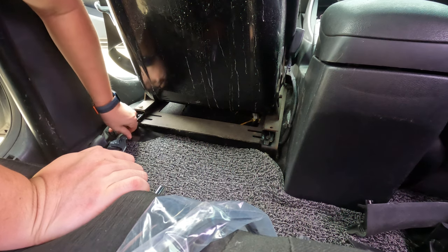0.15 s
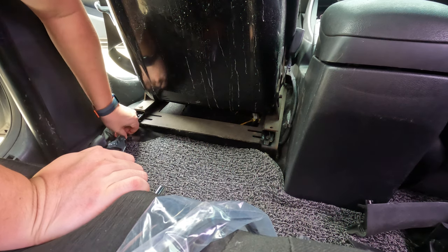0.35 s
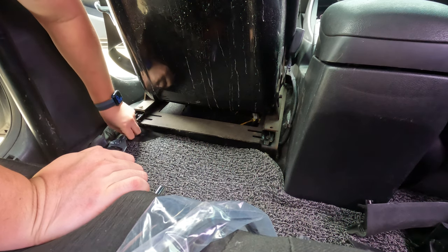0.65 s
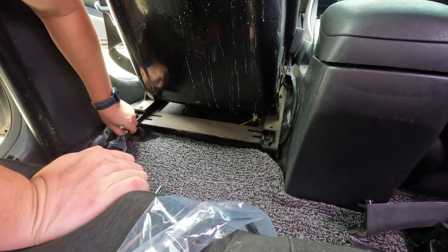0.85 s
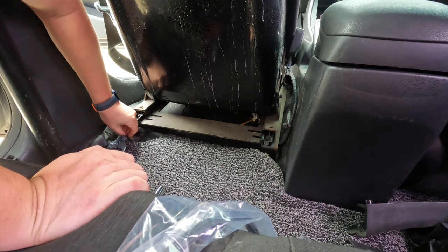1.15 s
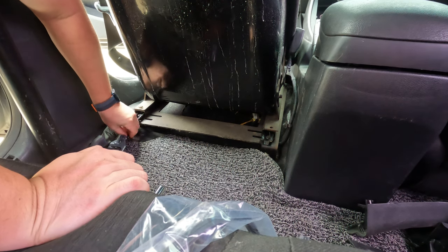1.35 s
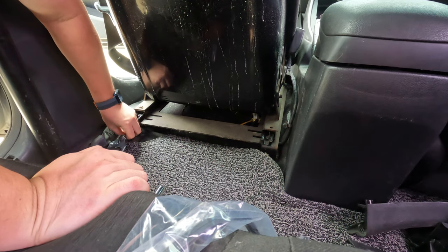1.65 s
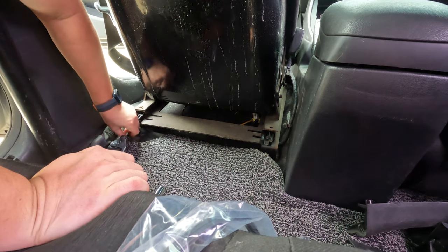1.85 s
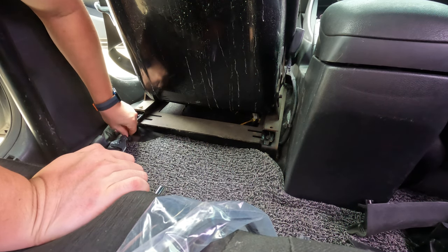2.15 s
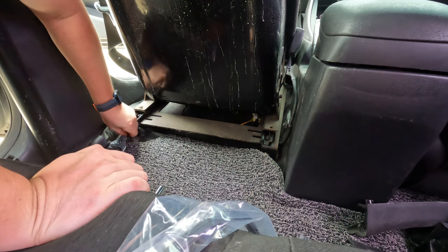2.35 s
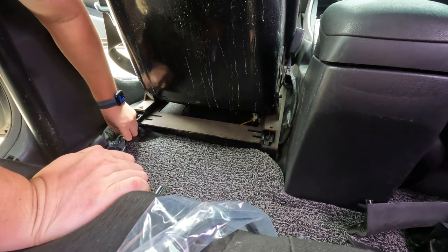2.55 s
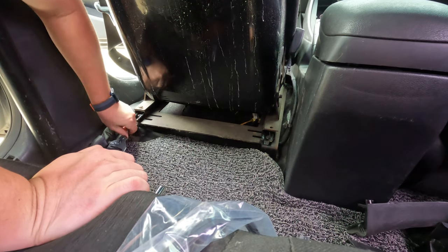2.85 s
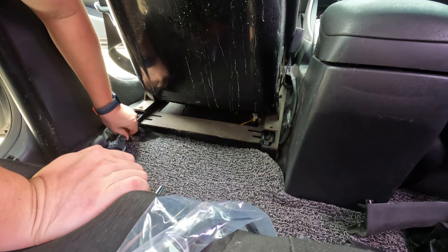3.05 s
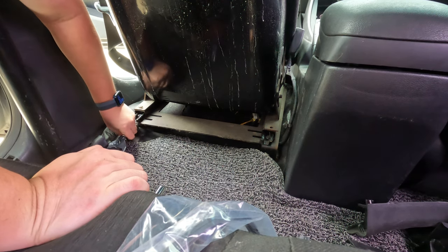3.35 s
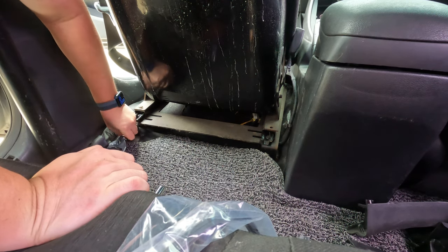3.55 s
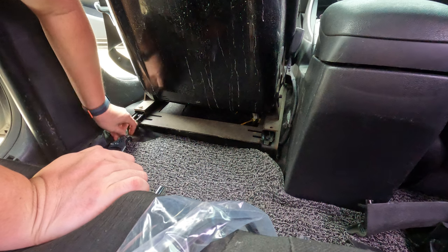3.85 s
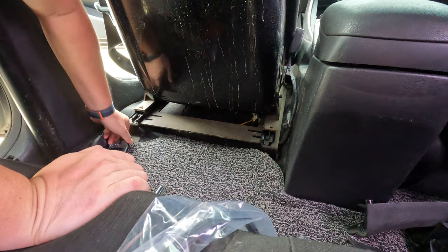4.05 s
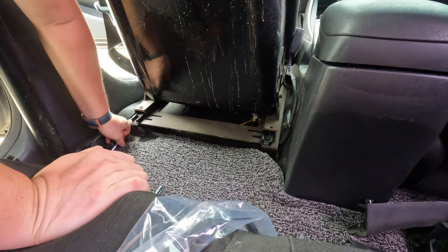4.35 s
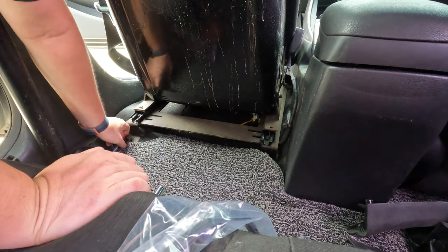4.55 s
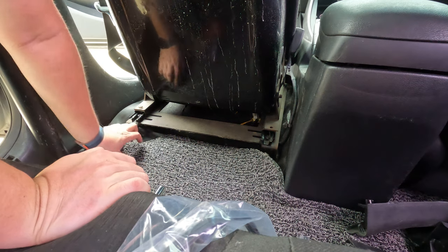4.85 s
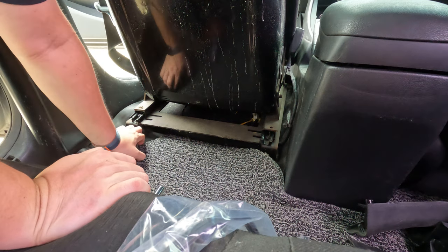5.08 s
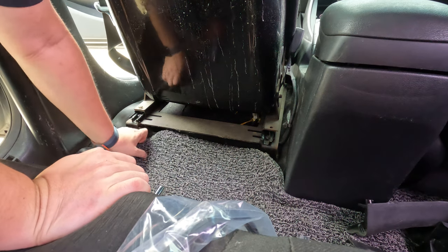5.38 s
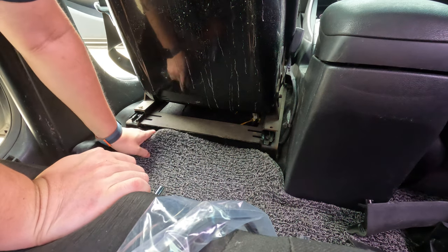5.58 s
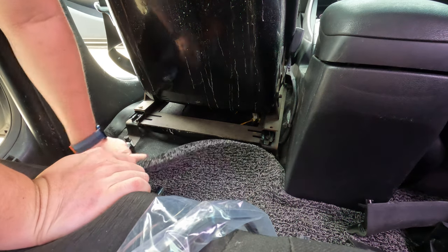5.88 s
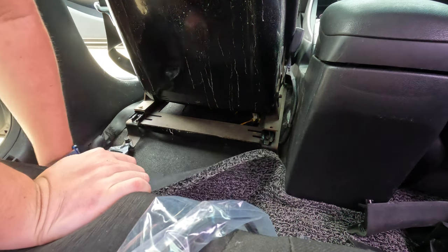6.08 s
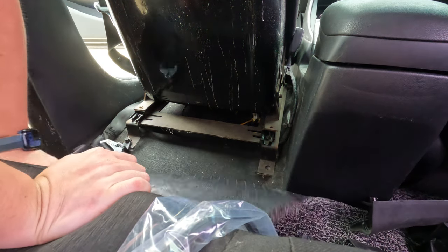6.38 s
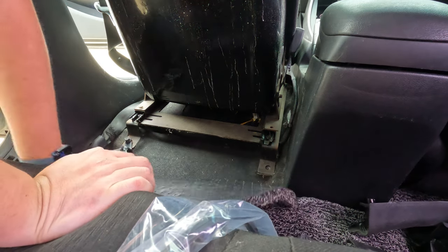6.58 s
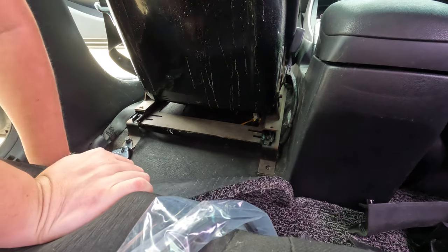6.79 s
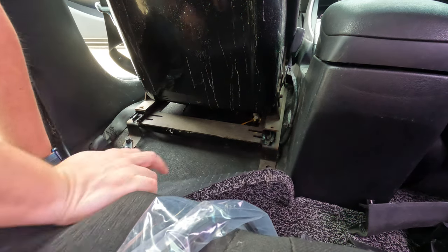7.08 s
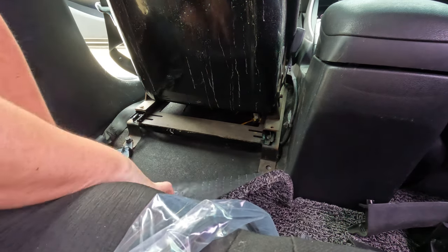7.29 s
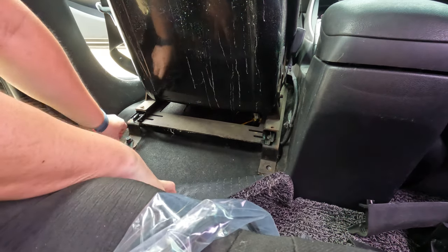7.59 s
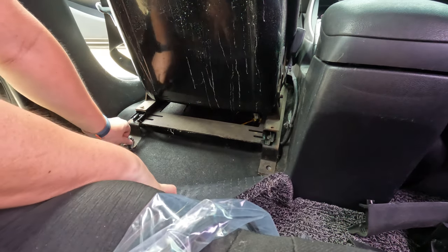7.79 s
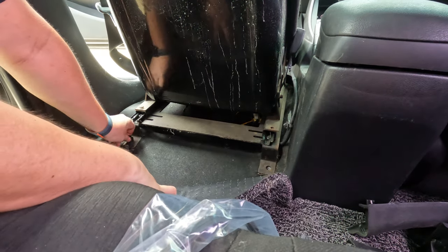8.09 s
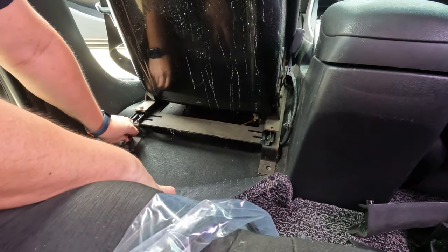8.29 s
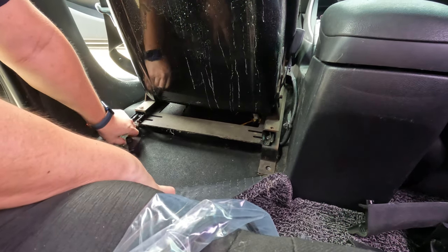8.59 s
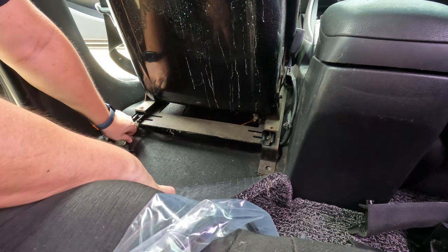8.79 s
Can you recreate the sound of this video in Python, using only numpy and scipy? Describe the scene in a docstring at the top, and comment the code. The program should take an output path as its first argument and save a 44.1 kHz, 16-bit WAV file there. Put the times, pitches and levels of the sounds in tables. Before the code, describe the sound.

Close, short metal clinks and knocks on a car floor, growing busier as a mat is dragged, over a low garage hum.

```python
"""Steel brackets chatter in short dull clinks as a hand fiddles with them on a car floor, close to a microphone.
Each bouncing contact drives the damped modes of the steel. A loose bolt pings, the floor pan thumps,
and heavy blows make the cabin air boom. Parts and a dragged mat scrape in dense small slips,
a sleeve rustles once, and the garage hums in the cabin. The sound is nearly mono."""
import sys
import numpy as np
from scipy import signal
from scipy.fft import rfft, irfft, next_fast_len
from scipy.io import wavfile
from scipy.ndimage import uniform_filter1d

SR = 44100
rng = np.random.default_rng(int(sys.argv[2]) if len(sys.argv) > 2 else 0)


def to_wav(s):
    """Save 16-bit WAV."""
    ch = np.atleast_2d(s).T  # columns
    pcm = np.round(np.clip(ch, -1, 1) * 32767)  # PCM
    wavfile.write(sys.argv[1], SR, pcm.astype(np.int16))


N = 393813
EVENT_SAMPLES = 6144
T = np.arange(EVENT_SAMPLES) / SR

# Bracket modes. Each row: frequency in Hz, level in dB, t60 in seconds.
BRACKET_MODES = [(880, -6, .02), (1130, -4, .016), (1345, -4, .016), (1640, 1, .022), (1790, 1, .021),
                 (1960, -4, .016), (2140, -3, .016), (2360, -2, .017), (2580, -2, .013), (2780, -3, .014),
                 (3120, -2, .013), (3330, -4, .012), (3600, -2, .012), (3800, -4, .012), (4080, -2, .011),
                 (4340, -4, .011), (4690, -6, .022), (4930, -2, .013), (5400, -1, .012), (5700, -2, .012),
                 (6200, -2, .012), (6600, -3, .011), (7700, -6, .011)]
# Steel contacts. Each row: time in seconds, level in dB, main ring in Hz, upper rings in relative dB,
# sizzle in relative dB, chatter t60 in seconds, main ring lift in dB, upper ring in Hz.
CLINK_HITS = [(0.287, -34, 1170, -14, -24, 0.022, 1, 4680),
              (0.389, -24.5, 1480, -3.5, -23, 0.027, -11, 5100),
              (0.448, -35, 1950, -7, -38, 0.035, -1, 4810), (0.469, -30, 1400, -15, -39, 0.022, 4, 4670),
              (0.509, -33.5, 2540, -16, -37, 0.024, 18, 3800),
              (0.519, -30.5, 2500, -10, -36, 0.058, 18, 4670),
              (0.587, -38, 2980, -11, -37, 0.025, 20, 3760), (0.62, -29, 1730, -13, -41, 0.028, 6, 4740),
              (0.647, -29, 1350, -1.5, -37, 0.015, 12, 3730),
              (0.894, -23.5, 1760, -18, -38, 0.017, -4, 3510),
              (0.907, -20.5, 1770, -8, -38, 0.038, -4, 3460),
              (0.932, -25.5, 2480, -9, -37, 0.058, 11, 5740),
              (0.954, -31.5, 1830, -3, -13, 0.051, -8, 4900),
              (0.985, -17, 2000, -8.5, -38, 0.042, 12, 3600), (0.998, -20, 2480, -5, -21, 0.042, 16, 4550),
              (1.059, -24, 1730, -35, -44, 0.063, 8, 3470), (1.09, -11.5, 1680, -39, -53, 0.019, 7, 3600),
              (1.337, -38.5, 1620, -18, -38, 0.027, 11, 4630),
              (1.367, -27.5, 1690, -9, -48, 0.035, 12, 4640), (1.374, -24, 1660, -16, -48, 0.033, 10, 5600),
              (1.399, -41, 1220, -17, -44, 0.022, 10, 3500), (1.417, -27, 1760, -26, -44, 0.015, 17, 3510),
              (1.441, -41, 2400, -7, -30, 0.032, 5, 3800), (1.581, -32.5, 1790, -9, -37, 0.025, 18, 3840),
              (1.597, -33, 1280, -20, -38, 0.018, 6, 3780), (1.979, -37, 1630, -24, -39, 0.019, 18, 3770),
              (2.41, -25.5, 1190, -8, -24, 0.032, 12, 3270), (2.437, -30, 1640, -23, -37, 0.027, 18, 3540),
              (2.464, -30.5, 1620, -9.5, -35, 0.038, 19, 3540),
              (2.626, -32.5, 1820, -2, -40, 0.019, 8, 5270), (2.782, -28, 1470, -1, -37, 0.015, 5, 3930),
              (2.84, -27, 1840, -5.5, -17, 0.024, -4, 7700),
              (2.871, -27.5, 1700, -14, -38, 0.014, 32, 4100),
              (3.069, -31.5, 1570, -10, -36, 0.025, 17, 4700), (3.085, -32, 1690, -5, -38, 0.023, 15, 4730),
              (3.125, -35, 1590, -3, -39, 0.034, 10, 3780), (3.146, -28, 1690, -9, -40, 0.027, -6, 4700),
              (3.156, -29.5, 1810, -21, -45, 0.017, 0, 4660), (3.219, -44, 1700, -8, -40, 0.025, 12, 4690),
              (3.257, -34.5, 1630, -19, -40, 0.046, 16, 4720),
              (3.274, -34, 1630, -18, -40, 0.027, 20, 3550), (3.296, -27.5, 1560, -12, -38, 0.028, 8, 3400),
              (3.817, -18, 1760, -30, -46, 0.011, 21, 3650),
              (3.889, -30, 1740, -13.5, -43, 0.039, -3, 4980), (3.954, -33, 1770, -29, -39, 0.02, 28, 4650),
              (3.974, -32, 1600, -32, -37, 0.031, 25, 4660), (4.017, -35, 1070, -6, -21, 0.029, 8, 3900),
              (4.067, -31, 1630, -3, -24, 0.042, 3, 4070), (4.081, -38, 1750, -5, -40, 0.03, 17, 4730),
              (4.103, -20, 1590, -22, -51, 0.027, 30, 3630), (4.129, -30, 1950, -11, -41, 0.038, 33, 3780),
              (4.158, -30.5, 1940, -9, -40, 0.03, 22, 4400), (4.205, -22, 1790, -6, -35, 0.033, 5, 4230),
              (4.228, -46, 1150, 3, -27, 0.028, 11, 5080), (4.252, -35, 2000, -17, -40, 0.037, -4, 3600),
              (4.267, -15.5, 1590, -14, -49, 0.02, 11, 5000), (4.299, -37, 1700, -12, -40, 0.022, 16, 3600),
              (4.315, -45, 2100, -11, -40, 0.018, 6, 4000), (4.374, -19.5, 1750, -7, -32, 0.022, 2, 4970),
              (4.435, -24.5, 1410, -9, -42, 0.014, -13, 3700), (4.451, -33, 2740, -8, -40, 0.019, 26, 5800),
              (4.558, -38, 2000, -5, -40, 0.027, 15, 3720), (4.667, -27.5, 2300, -7, -21, 0.028, 20, 3520),
              (4.686, -22.5, 1170, -15.5, -41, 0.024, 24, 3620),
              (4.723, -31, 1730, -13, -37, 0.025, 18, 5410),
              (4.743, -27.5, 1710, -13, -35, 0.036, 18, 3980), (4.788, -31, 2350, -5, -38, 0.031, 24, 3940),
              (4.808, -22, 2000, -8, -41, 0.028, 16, 3530), (4.87, -13, 3260, -1, -9.5, 0.022, 23.5, 5950),
              (5.174, -19, 1350, -11.5, -25, 0.0062, 13, 3870), (5.27, -33, 1770, -5.5, -41, 0.1, -9, 3650),
              (5.3, -27, 1765, -9, -48, 0.034, 3, 3860), (5.308, -22, 1765, -3, -48, 0.033, 1, 3760),
              (5.316, -33, 2400, -15, -50, 0.02, 3, 3640), (5.32, -37, 1300, -20, -45, 0.016, 2, 3600),
              (5.353, -16.5, 1750, -2.5, -29, 0.009, 2, 3840), (5.381, -24, 1670, -22, -40, 0.028, 7, 3530),
              (5.429, -23, 1640, -18, -48, 0.027, 0, 4960), (5.531, -20, 2740, -28, -36, 0.011, 10, 3510),
              (5.569, -31, 1770, -11, -12, 0.034, 7, 6200), (5.582, -16.5, 2000, -15, -20, 0.023, 1, 5000),
              (5.589, -3, 1550, -1, -9, 0.0048, 1, 7000), (5.6, -15, 1680, -15, -30, 0.037, 4, 5000),
              (5.639, -22, 1700, -23, -40, 0.035, 16, 3600), (5.662, -27, 1130, -11, -40, 0.01, 17, 4300),
              (5.678, -14.5, 1030, -9.5, -46, 0.0093, 12, 3530),
              (5.732, -27, 1120, -12, -44.5, 0.0083, 18, 3980),
              (5.816, -56, 1150, -19, -33, 0.02, 13, 3890), (5.903, -7, 3010, -24, -48, 0.0048, 33, 3220),
              (5.958, -18, 2520, -23, -37, 0.032, 19, 3430), (5.973, -25, 2700, -3, -37, 0.015, 21, 3600),
              (5.987, -17.5, 1720, -3, -16, 0.038, 8, 5270), (6.01, -4, 1760, -3, -19, 0.029, 5, 3800),
              (6.016, -6, 2000, -3.5, -19, 0.039, 3, 4960), (6.031, -19, 2300, -5, -18, 0.022, 3, 5400),
              (6.039, -0.5, 2630, -13, -18, 0.006, 23, 4100), (6.049, -25, 2000, -8, -25, 0.04, 6, 5000),
              (6.066, -20, 2700, -9, -30, 0.017, 8, 3600), (6.078, -10.5, 2690, -8, -41, 0.016, 24, 4760),
              (6.112, -15.5, 2080, -9, -19, 0.022, 14, 3760),
              (6.147, -18, 2120, -6.5, -17, 0.037, 26, 4150), (6.163, -24, 2000, -4, -18, 0.031, 3, 5000),
              (6.17, -15, 1240, -23, -24, 0.035, 33, 4000), (6.183, -20, 2200, -5, -11, 0.063, 3, 4500),
              (6.196, -12.5, 2500, -4.5, -16, 0.032, 17, 3880),
              (6.203, -8.5, 2560, -11, -26, 0.027, 23.5, 3880),
              (6.222, -31, 2300, -17, -30, 0.016, 15, 3800), (6.268, -11, 2200, -13, -30, 0.017, 9, 3560),
              (6.316, -19.5, 2200, -16, -39, 0.034, 11, 3550),
              (6.391, -24.5, 2970, -17, -43, 0.017, 19, 3700),
              (6.469, -13.5, 2580, -12.5, -47, 0.026, 6, 3500),
              (6.501, -18, 2060, -27, -45, 0.011, 25, 3750), (6.514, -25, 2400, -7, -29, 0.019, 5, 5000),
              (6.542, -25.5, 1560, -7, -39, 0.023, -12, 4900), (6.566, -40, 2000, 0, -35, 0.026, 5, 4500),
              (6.613, -18.5, 2170, -16, -45, 0.035, 27, 3940),
              (6.626, -17, 1840, -20, -39, 0.037, 12, 3670),
              (6.659, -17.5, 1720, -22, -35, 0.0093, 17, 3600),
              (6.669, -18, 1760, -12, -30, 0.015, 12, 4000), (6.691, -11.5, 1800, -3, -24, 0.016, -5, 3800),
              (6.708, -20, 2500, -1, -28, 0.013, 1, 3840), (6.719, -8, 2320, -13, -20, 0.021, 26, 4800),
              (6.727, -3.5, 2380, -5, -19, 0.033, 14, 5600), (6.744, -18, 2300, -16, -34, 0.011, 18, 4640),
              (6.787, -33, 2360, -6, -29, 0.028, 15, 3870), (6.873, -23.5, 2180, -15, -35, 0.053, 11, 3740),
              (6.924, -34.5, 1200, -5.5, -17, 0.16, 14, 3600),
              (7.033, -27.5, 1100, -12.5, -27, 0.072, 40, 4130),
              (7.133, -28.5, 1380, -26, -36, 0.018, 24, 4270),
              (7.178, -29, 1060, -13, -37, 0.018, 14, 3630), (7.281, -25, 2140, -16, -40, 0.0376, 19, 3600),
              (7.402, -22, 1460, -2.5, -19, 0.03, 9, 4420), (7.443, -5, 1810, -19, -54, 0.024, 5, 4200),
              (7.463, -13.5, 2520, -15, -50, 0.015, 15, 3600),
              (7.686, -27, 3000, -13, -53, 0.014, 27, 3520),
              (7.688, -22.5, 2370, -25, -53, 0.019, 28, 3560),
              (7.708, -32.5, 2400, -13, -45, 0.026, 26, 3600), (7.762, -40, 2000, -18, -45, 0.02, 23, 3600),
              (7.784, -23, 2620, -8.5, -22, 0.026, 21, 3600), (7.878, -34, 2240, -16, -43, 0.058, 15, 4230),
              (7.894, -25.5, 2630, -9.5, -38, 0.056, 15, 3860),
              (7.985, -37, 2070, -14, -40, 0.054, 14, 5400),
              (8.004, -24.5, 2070, -9.5, -25, 0.038, 16, 6200), (8.021, -29, 2780, -13, -35, 0.03, 8, 3900),
              (8.044, -24, 2700, -9, -22, 0.032, 9, 3700), (8.188, -38.5, 2470, -19, -35, 0.078, 18, 4070),
              (8.406, -37, 1990, -26, -36, 0.031, 21, 4540), (8.609, -23, 2760, -6, -19, 0.038, 23, 6100),
              (8.635, -12.5, 2300, -2.5, -21, 0.015, 8, 5130),
              (8.685, -31.5, 2880, -8, -20, 0.034, 9, 4680),
              (8.853, -26.5, 1600, -14.5, -48, 0.053, 1, 3970)]


def clinks():
    """Steel on steel: damped rings of the bracket, a crack under them, sizzle on top."""
    out = np.zeros(N + EVENT_SAMPLES)
    is_upper = np.transpose(BRACKET_MODES)[0] > 3500
    sines = mode_sines(BRACKET_MODES)
    for time_s, db, main_hz, upper_db, sizzle_db, t60_s, lift_db, upper_hz in CLINK_HITS:
        rise_s = 0.0016 + 0.06 * t60_s
        force = whiten(chatter(t60_s, rise_s, rough_db=3.5))
        gain_db = strike_db(BRACKET_MODES, main_hz, lift_db, octaves=0.19, scatter_db=5)
        gain_db += is_upper * strike_db(BRACKET_MODES, upper_hz, lift_db=19, octaves=0.19, scatter_db=5)
        # A clearer main ring has more grit around it and less crack.
        grit = 0.25 * undb(lift_db - 23) * peak1(band(force, main_hz / 1.7, main_hz * 1.03))
        crack = 0.66 * undb(-0.15 * max(lift_db, 0)) * peak1(band(force, 440, 2800, order=3))
        low_rings = peak1(ring(force, sines[~is_upper], gain_db[~is_upper], 523, 3870))
        upper_rings = peak1(ring(force, sines[is_upper], gain_db[is_upper], 3300, 8200))
        upper_crack = 0.9 * peak1(band(force, 3400, 7000, order=4))
        fine_chatter = chatter(1.26 * t60_s, rise_s=0.005, rough_db=-2)
        sizzle = undb(sizzle_db) * peak1(band(fine_chatter, 6100, 16200, order=4))
        body_gain = np.sqrt(max(1 - undb(upper_db) ** 2, 0.05))
        body = body_gain * peak1(low_rings + crack + grit)
        top = undb(upper_db) * peak1(upper_rings + upper_crack)
        add(out, time_s - rise_s / 2, undb(db) * (body + top + sizzle))
    return out[:N]


# Bolt modes. Each row: frequency in Hz, level in dB, t60 in seconds.
BOLT_MODES = [(1730, 0, 0.063), (4060, 2, .04), (4670, -3, 0.054), (6160, -3, .07), (9600, 1, 0.031),
              (11000, -6, 0.094)]
# Knocks on the bolt. Each row: start in seconds, peak in dB, favoured pitch in Hz.
BOLT_HITS = [(0.955, -46, 1720), (2.845, -57, 6350), (3.069, -37, 4700), (3.085, -43, 4700),
             (3.1, -42, 1720), (3.148, -49, 4700), (3.22, -54, 4700), (3.255, -46, 1720),
             (3.276, -41, 1720), (4.102, -38, 4700), (4.271, -38, 4700), (5.985, -37, 11000),
             (6.045, -35, 9400), (6.047, -43, 11000), (6.08, -27, 4700), (6.112, -51, 11000),
             (6.198, -32.5, 9400), (6.199, -33, 3900), (6.67, -42, 6350), (6.721, -38, 11000),
             (6.746, -31, 4700)]


def bolt_pings():
    """A loose bolt, knocked free, rings thin and clear with one mode far above the rest."""
    out, sines = np.zeros(N + EVENT_SAMPLES), mode_sines(BOLT_MODES)
    for start_s, db, hz in BOLT_HITS:
        force = whiten(chatter(0.015, rise_s=0.0011, rough_db=3))
        gain_db = strike_db(BOLT_MODES, hz, lift_db=36, octaves=0.1, scatter_db=2.5)
        add(out, start_s, undb(db) * peak1(ring(force, sines, gain_db, 1200, 14000)))
    return out[:N]


# Floor pan modes. Each row: frequency in Hz, level in dB, t60 in seconds.
PAN_MODES = [(150, -1, .05), (190, -1, .05), (240, -3, .04), (280, -1, .04), (332, 0, .04), (410, -3, .032),
             (460, -1, .036), (565, -2, .032), (660, -2, .028), (800, -5, .022)]
# Blows on the pan. Each row: start in seconds, peak in dB, favoured pitch in Hz, force t60 in seconds.
PAN_HITS = [(0.262, -24, 333, 0.04), (0.498, -32, 655, 0.04), (0.618, -28, 208, 0.048),
            (1.003, -13.5, 664, 0.035), (1.011, -20, 330, 0.069), (1.033, -22.5, 444, 0.091),
            (1.063, -24, 614, 0.061), (1.088, -20, 690, 0.08), (1.129, -29.5, 475, 0.03),
            (1.368, -35, 280, 0.05), (1.412, -41, 344, 0.027), (1.544, -31, 213, 0.03),
            (1.978, -26, 265, 0.021), (2.409, -21.5, 491, 0.055), (2.473, -31, 465, 0.062),
            (2.852, -20.5, 230.4, 0.075), (2.871, -27, 230, 0.057), (3.102, -30, 460, 0.03),
            (3.292, -47, 304, 0.077), (3.816, -26, 210, 0.052), (3.889, -27.5, 226, 0.051),
            (4.077, -29.5, 340, 0.033), (4.124, -23, 278, 0.018), (4.205, -17.5, 336, 0.013),
            (4.272, -27, 166, 0.038), (4.362, -23, 347, 0.091), (4.702, -28, 318, 0.025),
            (4.802, -21, 320, 0.059), (5.111, -32, 240, 0.037), (5.17, -30, 278, 0.027),
            (5.318, -26.5, 360, 0.033), (5.353, -16.5, 353, 0.054), (5.387, -21, 330, 0.024),
            (5.425, -17.5, 265, 0.033), (5.587, -21, 670, 0.012), (5.611, -6.5, 293, 0.028),
            (5.624, -14.5, 387, 0.059), (5.728, -29, 209, 0.015), (5.817, -25.5, 464, 0.04),
            (5.904, -14, 333, 0.0066), (6.012, -7.5, 475, 0.06), (6.024, -18, 460, 0.026),
            (6.035, -10, 348, 0.12), (6.081, -19, 266, 0.13), (6.114, -23.5, 463, 0.074),
            (6.192, -25, 274, 0.03), (6.262, -18.5, 473, 0.014), (6.313, -27, 486, 0.03),
            (6.474, -20, 294, 0.014), (6.516, -29, 464, 0.02), (6.602, -22.5, 315, 0.087),
            (6.692, -17, 460, 0.13), (6.722, -13, 514, 0.06), (6.742, -15, 500, 0.022),
            (6.758, -21, 271, 0.033), (7.134, -24, 150, 0.022), (7.406, -25, 460, 0.027),
            (7.444, -5.5, 596, 0.033), (7.452, -8, 324, 0.071), (7.456, -13, 190, 0.041),
            (7.466, -7, 294, 0.019), (7.477, -19, 240, 0.079), (7.502, -22.5, 336, 0.06),
            (7.528, -37, 194, 0.069), (7.688, -30.5, 330, 0.034), (7.761, -28, 180, 0.12),
            (7.804, -25.5, 300, 0.13), (7.895, -26.5, 225, 0.087), (8, -23.5, 474, 0.078),
            (8.039, -31, 470, 0.088), (8.609, -23.5, 472, 0.043), (8.686, -32, 484, 0.045),
            (8.851, -19, 476, 0.0058)]


def floor_thumps():
    """Soft blows ring the floor pan over a dull thud."""
    out, sines = np.zeros(N + EVENT_SAMPLES), mode_sines(PAN_MODES)
    for start_s, db, hz, t60_s in PAN_HITS:
        force = whiten(chatter(t60_s, rise_s=0.003, rough_db=4.5))
        gain_db = strike_db(PAN_MODES, hz, lift_db=20.5, octaves=0.096, scatter_db=3)
        knock = peak1(ring(force, sines, gain_db, 156, 900))
        thud = 0.42 * peak1(band(force, 118, 1180))
        add(out, start_s, undb(db) * peak1(knock + thud))
    return out[:N]


# Low cabin air modes. Each row: frequency in Hz, level in dB, t60 in seconds.
AIR_MODES = [(57.5, 0, 0.065), (75, 1, 0.12), (107, 0, 0.053)]
# Heavy blows. Each row: start in seconds, peak in dB.
HEAVY_HITS = [(7.134, -35), (7.449, -18), (7.505, -32), (7.803, -37)]


def cabin_booms():
    """Heavy blows on the floor ring the cabin air."""
    out, sines = np.zeros(N + EVENT_SAMPLES), mode_sines(AIR_MODES)
    for start_s, db in HEAVY_HITS:
        force = chatter(0.0267, rise_s=0.0012, rough_db=17)
        add(out, start_s, undb(db) * peak1(ring(force, sines, 0, 48, 150)))
    return out[:N]


# Steady fidgeting. One row: scrape in dB, rumble and hiss in dB relative to the scrape.
FIDGET_LEVELS_DB = (-62, 7.5, -5.5)
# Slides of parts and mat. Each row: peak time in seconds, scrape in dB, swell and fade in seconds
# per 20 dB, rumble and hiss in dB relative to the scrape.
SLIDE_STROKES = [(.05, -61.5, 0.15, 0.063, 13, 8), (.43, -54.5, 0.69, 0.27, 11, -3),
                 (0.544, -42, 0.11, 0.048, 7.5, -12), (.64, -48, 0.11, 0.13, 9, 1.5),
                 (1.0, -56, 0.58, 1, 12.5, -23), (1.428, -54.5, 0.13, 0.024, 20, -6),
                 (1.6, -59.5, 0.18, 0.31, 16.5, -15), (1.91, -58.5, 0.076, 0.067, 14, 12.5),
                 (2.45, -53, 0.12, 0.083, 14.5, -22), (2.65, -49.5, 0.2, 0.064, 11, -15),
                 (3.1, -49.5, 0.18, 0.39, 10, -17), (3.27, -56, 0.07, 0.23, 15.5, -14),
                 (4.08, -53, 0.39, 0.85, 10.5, -2.5), (4.299, -50.5, 0.099, 0.41, 11.5, -25),
                 (4.42, -45, 0.24, 0.037, 8, 0), (4.62, -50, 0.23, 0.64, -7, -3),
                 (4.8, -48.5, 0.27, 0.14, 11.5, 1), (5.399, -41.5, 0.12, 0.12, 9, -32),
                 (5.599, -34, 0.067, 0.1, 11, -31), (5.82, -60, 0.75, 0.55, -10, 9.5),
                 (6.031, -32.5, 0.12, 0.086, 7.5, 4.5), (6.19, -30.5, 0.056, 0.062, 6, -23),
                 (6.3, -39.5, 0.56, 0.11, 5.5, -9), (6.411, -32.5, 0.1, 0.046, -12, -8),
                 (6.53, -40, 0.37, 0.029, 4.5, 0), (6.703, -28.5, 0.18, 0.098, 2.5, -1),
                 (7.17, -49, 0.05, 0.17, 0, -12), (7.283, -42, 0.25, 0.13, 9, 4),
                 (7.47, -40.5, 0.17, 0.077, 10.5, 0), (7.8, -63, 0.23, 0.3, 4, 9),
                 (8.028, -39, 0.056, 0.048, 6, -26), (8.42, -49, 0.033, 0.21, 6.5, -15),
                 (8.648, -44, 0.086, 0.1, 10.5, -22), (8.93, -51.5, 0.14, .3, 12, -22)]


def stroke_gains():
    """Gains of scrape, rumble and hiss: each stroke swells and fades over the steady fidgeting."""
    def layers(db, rumble_db, hiss_db):
        return undb(db + np.array([[0], [rumble_db], [hiss_db]]))

    t = np.arange(0, N + 64, 64) / SR
    power = layers(*FIDGET_LEVELS_DB) ** 2
    for peak_s, db, swell_s, fade_s, rumble_db, hiss_db in SLIDE_STROKES:
        slope_s = np.where(t < peak_s, swell_s, fade_s)
        envelope = undb(-20 * np.abs(t - peak_s) / slope_s)
        power = power + (layers(db, rumble_db, hiss_db) * envelope) ** 2
    return [np.interp(np.arange(N) / SR, t, gain) for gain in np.sqrt(power)]


def rubbing():
    """Dense uneven slips of parts and mat ring bracket and pan weakly and hiss directly."""
    scrape_gain, rumble_gain, hiss_gain = stroke_gains()
    grip_db = 2.7 * wander(45)
    scrape_slips, rumble_slips, hiss_slips = [
        rng.standard_normal(N) * undb(1.8 * rng.exponential(size=N) + grip_db + 1.3 * wander(60))
        for _ in range(3)]
    bracket = rms1(ring(scrape_slips, mode_sines(BRACKET_MODES), 0, 830, 7100))
    scrape = rms1(0.48 * bracket + rms1(band(scrape_slips, 480, 2500)))
    pan = rms1(ring(rumble_slips, mode_sines(PAN_MODES), 0, 179, 750))
    rumble = rms1(pan + 1.06 * rms1(band(rumble_slips, 194, 673)))
    hiss = rms1(band(hiss_slips, 1400, 4640))
    hiss += undb(-14) * rms1(band(hiss_slips, 4700, 14100, order=3))
    return scrape_gain * (scrape + undb(-3) * crackle()) + rumble_gain * rumble + hiss_gain * hiss


def crackle(kinds=4, ticks_per_s=450, spread_db=3.5):
    """Small parts tick at random, each kind touching the bracket at its own spot."""
    tick_samples = EVENT_SAMPLES // 4
    out, sines = np.zeros(N), mode_sines(BRACKET_MODES)[:, :tick_samples]
    for hz in np.geomspace(1200, 3400, kinds):
        onsets = rng.random(N) < ticks_per_s / kinds / SR
        ticks = onsets * undb(spread_db * rng.exponential(size=N).clip(0, 3))
        bounce = chatter(0.027, rise_s=0.0012, rough_db=6)[:tick_samples]
        force = signal.fftconvolve(ticks, bounce)[:N]
        gain_db = strike_db(BRACKET_MODES, hz, lift_db=10.5, octaves=0.3, scatter_db=-6.5)
        rings = rms1(ring(force, sines, gain_db, 860, 4450))
        grit = 0.53 * rms1(band(force, hz / 1.2, hz * 1.31))
        out += rms1(rings + grit) * undb(-3 * np.log2(hz / 1700))
    return rms1(out)


# Sleeve envelope. Each row: time in seconds, low rustle in dB, higher rustle and hiss in relative dB.
SLEEVE_LEVELS = [(7.12, -50, -2, -3), (7.236, -38.5, -1, -10), (7.26, -39, 8, 0.5), (7.284, -33, -11, 0),
                 (7.304, -35, -9, -20), (7.35, -45, -14, -8), (7.382, -66, -7, 6), (7.4, -58, -10, 1)]
# Bands of those three layers. Each row: low edge in Hz, high edge in Hz.
SLEEVE_BANDS_HZ = [(560, 710), (850, 1200), (1900, 4500)]


def sleeve():
    """Cloth brushes past: three bands of slightly grainy noise swell together."""
    times_s, db, *relative_db = np.transpose(SLEEVE_LEVELS)
    t, out = np.arange(N) / SR, np.zeros(N)
    for (lo_hz, hi_hz), offset_db in zip(SLEEVE_BANDS_HZ, [0] + relative_db):
        level_db = np.interp(t, times_s, db + offset_db, left=-120, right=-120)
        out += undb(level_db + 0.89 * wander(50)) * rms1(band(rng.standard_normal(N), lo_hz, hi_hz))
    return out


# Garage noise spectrum. Each row: frequency in Hz, relative density in dB.
GARAGE_SPECTRUM = [(12, -50), (20, -7), (65, -1.5), (87, -16), (123, 0.5), (217, 4), (370, -2),
                   (483, -12.5), (944, -17.5), (1700, -17.5), (2220, -25.5), (3600, -26.5), (7220, -37),
                   (9180, -51.5), (12000, -68), (15600, -99), (22000, -120)]
# Cabin air resonances. Each row: centre in Hz, width in Hz, level in dB.
CABIN_RESONANCES = [(76, 14.9, -48), (208.3, 14, -50.5), (333, 11.3, -55.5), (417, 63, -75),
                    (504, 90, -60.5), (577, 54, -89)]


def garage_hum(level_db=-45):
    """Broad garage noise wavers a little and keeps the cabin's air resonances ringing."""
    out = rms1(colour(rng.standard_normal(N), GARAGE_SPECTRUM)) * undb(level_db + 0.9 * wander(15))
    for hz, width_hz, db in CABIN_RESONANCES:
        gain = undb(db + 0.34 * wander(2.4))
        out += gain * rms1(band(rng.standard_normal(N), hz - width_hz / 2, hz + width_hz / 2))
    return out


def chatter(t60_s, rise_s, rough_db):
    """Force of a bouncing contact: uneven tiny impacts that swell and die away."""
    swell = np.sin(np.pi / 2 * np.clip(T / rise_s, 0, 1)) ** 2
    fade = np.exp(-np.log(1000) * np.maximum(T - rise_s, 0) / np.clip(t60_s, 0.002, 0.25))
    return swell * fade * rng.standard_normal(EVENT_SAMPLES) * undb(
        rough_db * rng.exponential(size=EVENT_SAMPLES))


def whiten(force):
    """Flattens the spectrum of a force and keeps its timing."""
    spectrum = rfft(force, 2 * EVENT_SAMPLES)
    power = uniform_filter1d(np.abs(spectrum) ** 2, size=48)
    return irfft(spectrum / np.sqrt(power + 1e-12))[:EVENT_SAMPLES]


def mode_sines(modes):
    """The decaying sine of each mode."""
    hz, db, t60_s = np.transpose(modes)[:, :, None]
    return undb(db) * np.sin(2 * np.pi * hz * T) * np.exp(-np.log(1000) * T / t60_s)


def strike_db(modes, hz, lift_db, octaves, scatter_db):
    """Mode gains: the struck spot lifts those near one pitch, and all vary by chance."""
    distance = np.log2(np.transpose(modes)[0] / hz) / octaves
    return lift_db * np.exp(-distance ** 2) + scatter_db * rng.standard_normal(len(modes))


def ring(force, sines, gain_db, lo_hz, hi_hz):
    """A force drives modes of random sign; a small body radiates nothing far from its modes."""
    response = (undb(gain_db) * rng.choice([-1, 1], size=len(sines))) @ sines
    return band(signal.fftconvolve(force, response)[:len(force)], lo_hz, hi_hz, order=3)


def wander(rate_hz):
    """Ramps between random levels, RMS 1."""
    hold = int(SR / rate_hz)
    steps = np.repeat(rng.standard_normal(N // hold + 1), hold)
    return rms1(uniform_filter1d(steps, hold)[:N])


def colour(x, points):
    """Weights the spectrum by (Hz, dB) points."""
    hz, db = np.transpose(points)
    n = next_fast_len(len(x))
    bins_hz = np.maximum(np.arange(n // 2 + 1) * SR / n, 1)
    gain = undb(np.interp(np.log(bins_hz), np.log(hz), db))
    return irfft(rfft(x, n) * gain, n)[:len(x)]


def band(x, lo_hz, hi_hz, order=2):
    return signal.sosfilt(signal.butter(order, [lo_hz, hi_hz], "band", fs=SR, output="sos"), x)


def undb(db):
    return 10 ** (np.asarray(db) / 20)


def rms1(x):
    return x / np.sqrt(np.mean(x ** 2))


def peak1(x):
    return x / np.abs(x).max()


def add(out, start_s, sound):
    i = int(start_s * SR)
    out[i:i + EVENT_SAMPLES] += sound


# Microphone response. Each row: frequency in Hz, gain in dB.
MIC_RESPONSE = [(20, 1), (6500, -1.5), (7600, -5.5), (8500, -5.5), (9050, -13), (9500, -4.5), (11500, -8),
                (13000, -19.5), (14500, -26), (15500, -34)]


def scene(tail_t60_s=0.064, wet_db=-9.5):
    """Close sounds and their short cabin tail, coloured by the microphone, over the hum."""
    near = clinks() + bolt_pings() + floor_thumps() + cabin_booms() + rubbing() + sleeve()
    tail = rng.standard_normal(EVENT_SAMPLES) * np.exp(-np.log(1000) * T / tail_t60_s) * (T > 0.003)
    wet = signal.fftconvolve(near, tail / np.sqrt(np.sum(tail ** 2)))[:N]
    mono = colour(near + undb(wet_db) * wet, MIC_RESPONSE) + garage_hum()
    return np.array([mono, mono])


# Stereo width. Each row: frequency in Hz, side level in dB relative to mid.
SIDE_SPECTRUM = [(300, -80), (1200, -69), (3000, -56), (6000, -27), (9000, -22), (13000, -4)]


def record(dry):
    """Rounds the peaks, widens the treble slightly and cuts the top."""
    drive, cutoff_hz = 0.6, 15800
    mid = np.tanh(drive * dry.mean(0)) / drive
    smear = rng.standard_normal(512)
    side = colour(signal.fftconvolve(mid, smear / np.sqrt(np.sum(smear ** 2)), "same"), SIDE_SPECTRUM)
    lowpass = signal.ellip(8, 0.2, 70, cutoff_hz, fs=SR, output="sos")
    return signal.sosfilt(lowpass, [mid + side, mid - side])


dry = scene()
out = record(dry)
to_wav(out)
```